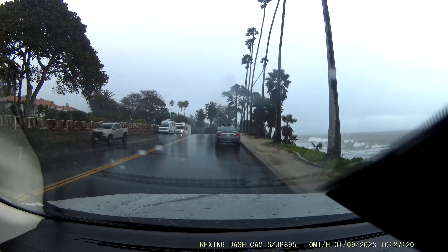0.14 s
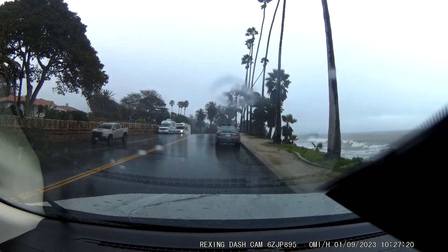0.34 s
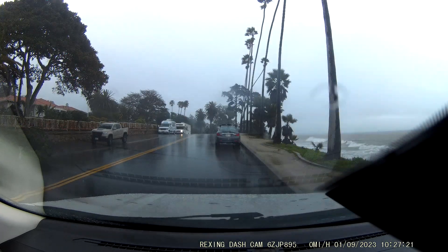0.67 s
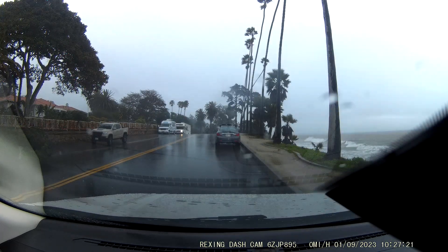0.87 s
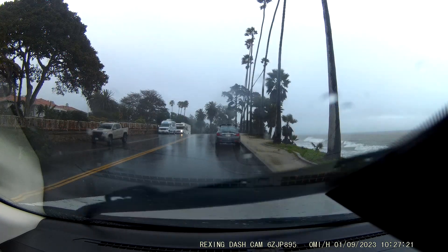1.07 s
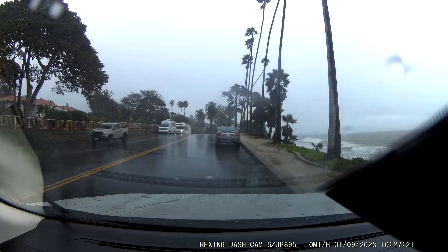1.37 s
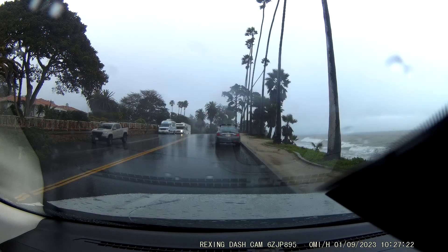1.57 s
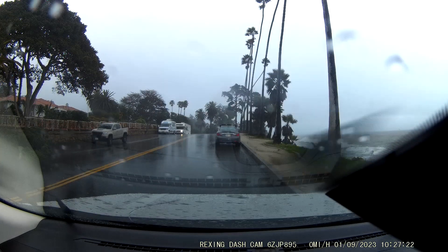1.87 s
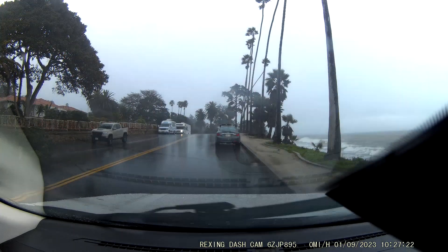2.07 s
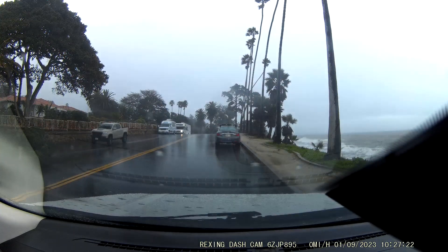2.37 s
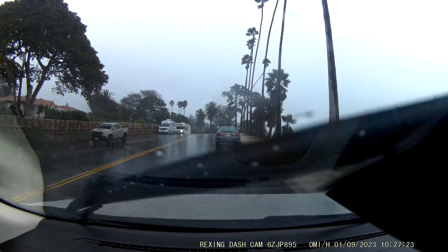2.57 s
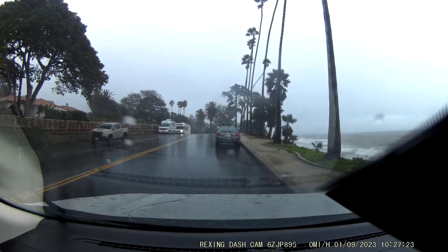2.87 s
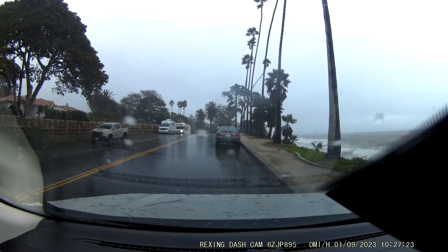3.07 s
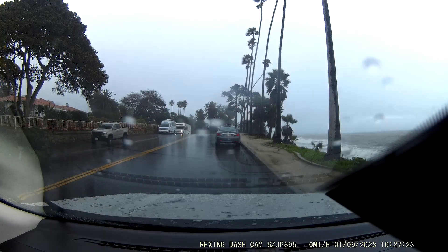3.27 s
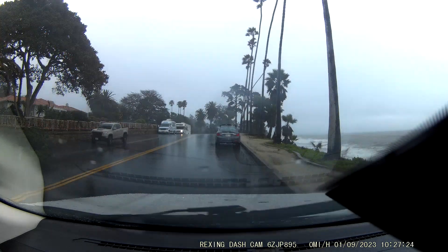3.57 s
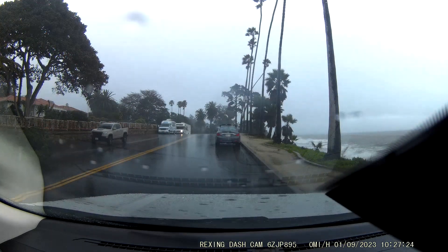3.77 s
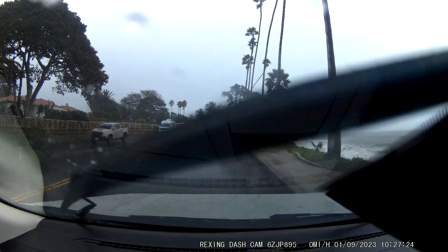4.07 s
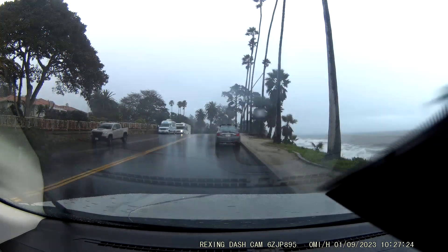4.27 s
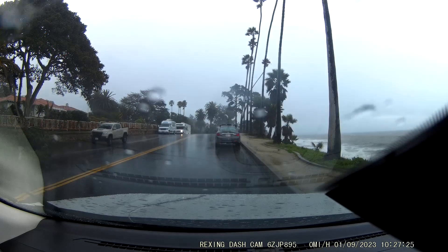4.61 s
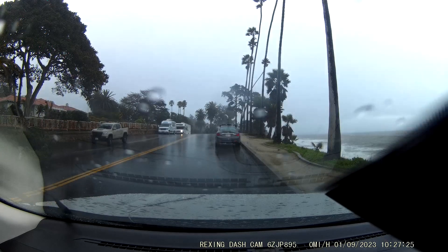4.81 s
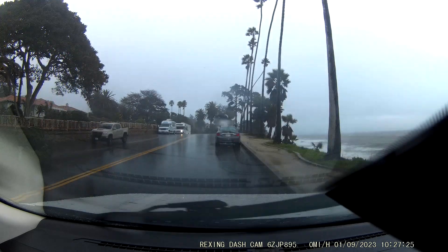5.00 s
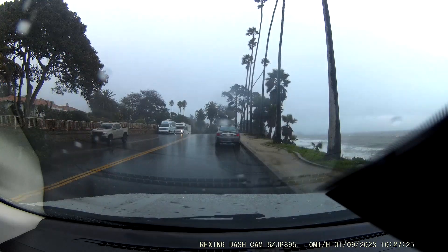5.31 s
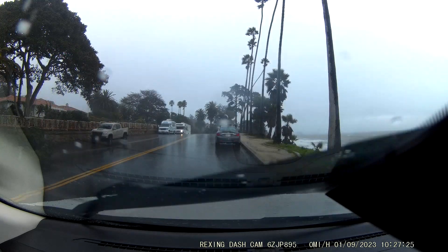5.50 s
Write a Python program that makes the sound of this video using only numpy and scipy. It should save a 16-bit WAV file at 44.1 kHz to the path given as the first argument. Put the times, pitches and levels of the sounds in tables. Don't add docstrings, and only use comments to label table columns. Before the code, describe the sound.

Rain heard from a microphone just behind the windscreen of an idling car. Fine crisp taps and fat drops scatter over a steady hum and muffled fan noise. Four hollow wiper knocks alternate with four rubbery double flips and deep body shakes. Small water spills and sharper roof pats come midway; the last flip is followed by faint approaching wet tyres.

```python
import sys
import numpy as np
from scipy import signal
from scipy.fft import rfft, irfft, next_fast_len
from scipy.io import wavfile
from scipy.ndimage import uniform_filter1d, map_coordinates

SR = 44100
rng = np.random.default_rng(int(sys.argv[2]) if len(sys.argv) > 2 else 0)


def boost_factor(decibels):
    exponent = np.asarray(decibels, float) / 20
    return 10 ** exponent


def pcm_store(signal):
    levels = np.round(np.clip(np.atleast_2d(signal), -1, 1) * 32767)
    wavfile.write(sys.argv[1], SR, levels.astype(np.int16).T)


N = 249165

# start in seconds, level in dB, brightness in dB per octave,
# level of the first touch in dB.
PARK_KNOCKS = [
    (0.1826, -18.5, 2.5, -18),
    (1.66, -19, 1, -16),
    (3.1285, -21, 1.5, -14),
    (4.601, -20, 1, -25),
]
# frequency in Hz, level in dB per Hz.
SCUFF_SPECTRUM = [(80, 4), (150, 12), (220, -6.5), (400, 1), (800, -10), (1300, -8), (2500, -28),
                  (6000, -29)]
PANE_HZ = 3305


def unit(x):
    return x / np.sqrt(np.mean(x ** 2) + 1e-20)


def curves(rows):
    s, *cols = np.transpose(rows)
    return [np.interp(np.arange(N) / SR, s, c) for c in cols]


def wobble(rate):
    knots = rng.standard_normal(int(N * rate / SR) + 4)
    return map_coordinates(knots, [np.arange(N) * rate / SR])


def swells(times, wide):
    away = np.arange(N) / SR - np.array(times)[:, None]
    return np.exp(-.5 * (away / wide) ** 2).sum(axis=0)


def coloured(x, spectrum):
    size = next_fast_len(N + 8192)
    hz, db = np.transpose(spectrum)
    bins = np.fft.rfftfreq(size, 1 / SR)
    gain = boost_factor(np.interp(np.log(bins + 1), np.log(hz + 1), db, left=-120, right=-120))
    return unit(irfft(rfft(x, size) * gain, size)[:N])


def rush(spectrum, patchy_db):
    z = signal.stft(rng.standard_normal(N), nperseg=512)[2]
    field = uniform_filter1d(rng.standard_normal(z.shape), size=6, axis=0)
    field = uniform_filter1d(field, size=10, axis=1)
    noise = signal.istft(z * boost_factor(patchy_db * unit(field)), nperseg=512)[1][:N]
    return coloured(noise, spectrum)


def add(track, s, sound):
    part = track[max(round(s * SR), 0):][:len(sound)]
    part += sound[:len(part)]


def ring(hz, t60, attack, length, crest=0):
    t = np.arange(round(length * SR)) / SR
    decay = boost_factor(-60 * t / t60)
    return np.cos(2 * np.pi * hz * (t - crest)) * decay * (1 - np.exp(-t / attack)) ** 2


def snap(low_hz, high_hz, crowd):
    band = signal.butter(N=3, Wn=[low_hz, high_hz], btype="band", fs=SR, output="sos")
    push = crowd * rng.standard_normal(900) * boost_factor(-60 * np.arange(900) / SR / 0.0042)
    push[0] = 1
    click = signal.sosfilt(band, push)
    return click / np.abs(click).max()


def gusts():
    # time in seconds, strength of the rain in dB.
    rain = [
        (0.0, -56),
        (0.28, -58.5),
        (1.41, -52),
        (2.0, -56),
        (2.53, -54.5),
        (3.38, -54.5),
        (3.79, -56),
        (4.74, -53),
        (5.24, -57),
        (5.65, -52),
    ]
    db, = curves(rain)
    return db - db.mean()


def engine():
    # time in seconds, firing rate in Hz, level in dB.
    idle = [
        (0, 29.84, -40),
        (1.5, 30.44, -40),
        (3, 30.62, -39.5),
        (4.5, 30.6, -41),
        (5.65, 29.9, -41.5),
    ]
    hz, db = curves(idle)
    turn = 2 * np.pi * np.cumsum(hz) / SR
    flutter = 1 + 0.053 * np.sin(turn / 2) + 0.049 * wobble(4.07)
    firing = boost_factor(db) * np.sqrt(2) * flutter * np.sin(turn)
    return firing + boost_factor(db - 14) * np.sin(2 * turn)


def cabin():
    # frequency in Hz, level in dB per Hz.
    blower_spectrum = [(300, -31), (450, -11), (600, -5), (720, -3), (770, -2), (802, 4), (835, -1),
                       (900, -5), (1300, -11.5), (1800, -17.5), (2500, -61)]
    # frequency in Hz, level in dB per Hz.
    hiss_spectrum = [(3240, -32), (5500, -2), (7320, -35), (8090, -7), (8970, -9), (14300, -11),
                     (15000, -11.5), (15500, -22)]
    # frequency in Hz, rms level in dB.
    whine_tones = [(7212, -102), (14423, -88)]
    blower_db, blower_follows = -48, 0.18
    hiss_db, hiss_follows = -67.5, 0.32
    blower_gain = boost_factor(blower_db + blower_follows * gusts() + 1.04 * wobble(11))
    blower = blower_gain * rush(blower_spectrum, patchy_db=-0.47)
    hiss = boost_factor(hiss_db + hiss_follows * gusts()) * rush(hiss_spectrum, patchy_db=1.5)
    t = np.arange(N) / SR
    whine = sum(boost_factor(db) * np.sqrt(2) * np.sin(2 * np.pi * hz * t) for hz, db in whine_tones)
    return blower + hiss + whine


def swish():
    # frequency in Hz, level in dB per Hz.
    spray_spectrum = [(3500, -20), (6500, -7), (9500, 0), (11500, -5), (14500, -21)]
    nearing = swells([5.68], 0.069)
    return boost_factor(-64) * nearing * rush(spray_spectrum, patchy_db=3)


def patter():
    # frequency in Hz, level in dB per Hz.
    wash_spectrum = [(880, -28), (1500, -1.5), (1640, -3.5), (2140, -5.5), (3240, -4.5), (3600, -10.5),
                     (4970, -10.5), (5440, -7.5), (7200, -17.5), (8000, -18.5), (10400, -56), (17600, -120)]
    # frequency in Hz, level in dB per Hz.
    tap_spectrum = [(1200, -30), (2000, -14), (2700, -8), (3200, 0), (3700, -3), (4800, -4), (5800, -10),
                    (7000, -22), (13000, -30), (15600, -36)]
    # frequency in Hz, level in dB per Hz.
    spill_spectrum = [(1500, -24), (2500, -4), (3250, 3.5), (3800, -6), (5500, -9), (7500, -25),
                      (13000, -37)]
    # start in seconds, level in dB, decay t60 in seconds.
    spills = [
        (3.9, -58, 0.034),
        (3.055, -41, 0.084),
        (2.9, -52, .04),
        (2, -47, 0.046),
    ]
    patter_db = -57 + gusts()
    draw = rng.random((3, N))
    struck = draw[0] < 450 / SR
    taps = struck * boost_factor(-3.2 * np.log(draw[1] + .09)) * np.sign(draw[2] - .5)
    spill = np.zeros(N)
    for s, db, t60 in spills:
        add(spill, s, boost_factor(db) * ring(0, t60, 0.0007, .08))
    wash = rush(wash_spectrum, patchy_db=.8) + .5 * coloured(taps, tap_spectrum)
    return boost_factor(patter_db + 0.58 * wobble(8.1)) * wash + spill * rush(spill_spectrum, patchy_db=0.5)


def near_drops():
    # start in seconds, peak level in dB, frequency in Hz.
    ticks = [(0.1715, -39, 3180), (0.2988, -42.5, 3860), (0.3142, -41, 3380), (0.659, -44.5, 3680),
             (1.051, -39, 3230), (1.278, -37, 3400), (1.5244, -38, 2730), (1.604, -38, 3000),
             (1.6464, -40, 3530), (1.9105, -37.5, 3150), (2.0946, -41, 3320), (2.2618, -40, 3120),
             (2.3236, -38, 3370), (2.4542, -38, 3200), (2.799, -39, 3240), (3.1742, -38.5, 3300),
             (3.21, -38, 2800), (3.2876, -39.5, 3340), (3.5269, -38.5, 3380), (3.7833, -40, 3180),
             (4.0923, -42, 3230), (4.2465, -42, 3020), (4.6606, -39.5, 3500), (4.6897, -38.5, 3310),
             (4.7364, -39, 3800), (5.1255, -39, 3350), (5.2365, -39, 3100), (5.253, -41, 3310),
             (5.3961, -46, 3250), (5.4101, -41, 3470)]
    # start in seconds, peak level in dB, body level in dB.
    plops = [(0.4439, -44, 3), (0.621, -43, 3), (1.0727, -40.5, 2), (1.1866, -30, -1.5), (1.3917, -47, 1),
             (1.455, -41, -1.5), (1.5599, -40, 4), (1.6633, -36.5, 1), (2.3405, -39, -6), (2.3504, -38, -3),
             (2.5492, -41, 6), (2.5716, -41, 2), (2.823, -39, -1.5), (3.039, -43, 2), (3.3103, -40, 6),
             (3.417, -40, -1.5), (3.5583, -35, -2), (3.934, -43, -1.5), (3.968, -38.5, 1),
             (3.9918, -40.5, 7), (4.0246, -38.5, -1.5), (4.2802, -47, 2), (4.6057, -39, 2),
             (4.9695, -40, 1), (5.0015, -41, -1.5), (5.0527, -41, 2), (5.1138, -39, 3), (5.2614, -36.5, 1),
             (5.434, -44, -5), (5.4924, -43, 3)]
    tick_body_db = -5
    stray_db, stray_spread_db, stray_body_db = -46, 3, -2
    count = int(28 * N / SR)
    when = rng.random(count) * N / SR
    size = rng.standard_normal((count, 3))
    rows = [(s, db, hz, tick_body_db) for s, db, hz in ticks]
    rows += [(s, db, PANE_HZ, body_db) for s, db, body_db in plops]
    for s, (a, b, c) in zip(when, size):
        db = stray_db + stray_spread_db * min(a, 1.4)
        rows.append((s, db, PANE_HZ * (1 + 0.063 * b), stray_body_db + 4 * c))
    return rows


def drops():
    # start in seconds, peak level in dB.
    pings = [(0.5477, -53), (0.6295, -54), (1.2775, -52), (1.3648, -50), (1.3927, -56), (2.613, -54),
             (2.7337, -52), (2.826, -51), (3.2869, -56), (3.3099, -53), (3.8467, -53), (3.9674, -52),
             (4.1225, -56)]
    # start in seconds, level in dB, frequency in Hz, t60 in seconds.
    splats = [
        (0.084, -41, 305, 0.031),
        (.63, -44, 361, 0.15),
        (3.04, -34, 890, 0.033),
        (3.056, -28.5, 1064, 0.037),
        (4.327, -27, 1300, 0.042),
        (5.059, -35, 350, 0.1),
    ]
    panel_modes = ((.9, 0), (1.02, 2), (1.2, -3))
    spray_db, spray_grows = -29.5, .5
    out = np.zeros(N)
    spray = snap(5500, 10300, crowd=0.25)
    for s, db, hz, low_db in near_drops():
        glass = .4 * ring(hz, .016, .0002, 900 / SR) + snap(.92 * hz, 4600, crowd=.12)
        low = boost_factor(low_db - 2.5) * snap(1040, 1990, crowd=0.22)
        high = boost_factor(spray_db + 16 + (spray_grows - 1) * (db + 45)) * spray
        add(out, s + .001, boost_factor(db + .3) * (glass + low + high))
    for s, db in pings:
        add(out, s, boost_factor(db + 4) * snap(4500, 11500, crowd=.25))
    for s, db, hz, t60 in splats:
        boom = sum(boost_factor(side_db) * ring(hz * k, t60, 0.0026, .1) for k, side_db in panel_modes)
        add(out, s, boost_factor(db) * boom)
    return out


def wipers():
    # frequency in Hz, level in dB per Hz.
    shake_spectrum = [(8.8, -42), (15, -13), (38, -14), (46, -41), (54, 44), (118, -1), (140, -34),
                      (180, -24), (310, -120)]
    # frequency in Hz, level in dB per Hz.
    linkage_spectrum = [(53, -13), (90, 1.5), (145, -1.5), (237, -4.5), (264, -7.5), (377, -3),
                        (426, -12.5), (650, -14), (840, -69), (1430, -120)]
    # start in seconds, level in dB.
    flips = [
        (0.879, -27),
        (.895, -28.5),
        (2.345, -27.5),
        (2.36, -27.5),
        (3.821, -25.5),
        (3.84, -29),
        (5.292, -27.5),
        (5.305, -27.5),
    ]
    # frequency in Hz, level in dB, decay t60 in seconds.
    blade_modes = [(157, -3, 0.082), (194, -2.5, 0.13), (354, 7, 0.014), (430, -1, 0.022), (570, -7, .04),
                   (700, -12, 0.096)]
    # start in seconds, level in dB, start frequency in Hz,
    # end frequency in Hz, rise in seconds.
    shudders = [(0.888, -25, 143, 54.7, 0.026), (0.941, -37, 60, 45, 0.015), (1.078, -31, 101, 66, 0.018),
                (1.128, -31.5, 92, 56, 0.019), (2.347, -27, 150, 51.6, 0.041),
                (2.534, -33.5, 101, 61, 0.021), (2.6, -35, 70, 48, 0.018), (3.829, -25.5, 150, 49.5, 0.032),
                (3.998, -32, 106, 64.5, 0.026), (5.297, -25.5, 150, 48.7, 0.041),
                (5.48, -28, 101, 67.7, 0.027)]
    parks = np.array([row[0] for row in PARK_KNOCKS])
    turns = np.array([row[0] for row in flips[::2]])

    shake_db = -52.5 + 10.5 * swells(turns + 0.2, .1) - 5 * swells(parks - 0.16, 0.16)
    linkage_db = -48.5 + 8 * swells(parks - 0.11, 0.075) + 2.5 * swells(turns + .16, 0.09)
    out = boost_factor(shake_db + 1.5 * wobble(14)) * rush(shake_spectrum, patchy_db=2.5)
    out += boost_factor(linkage_db + 0.73 * wobble(11)) * rush(linkage_spectrum, patchy_db=1.5)

    drag = np.zeros(N)
    for s, db in flips:
        add(drag, s, boost_factor(db - 5.5) * ring(0, 0.096, 0.0039, .15))
        spread = rng.standard_normal((len(blade_modes), 3))
        for (hz, level, t60), (a, b, c) in zip(blade_modes, spread):
            crest = 0.00294 + 0.00211 * c
            mode = ring(hz * (1 + 0.057 * b), t60, 0.0011, .15, crest=crest)
            add(out, s, boost_factor(db + level - 4.5 + 2.4 * a) * mode)
    out += drag * rush(SCUFF_SPECTRUM, patchy_db=0.5)

    t = np.arange(SR // 4) / SR
    for s, db, hz, end_hz, rise in shudders:
        falling = end_hz + (hz - end_hz) * np.exp(-t / (0.55 * rise))
        swell = (t / rise * np.exp(1 - t / rise)) ** 4
        add(out, s, boost_factor(db) * swell * np.sin(2 * np.pi * np.cumsum(falling) / SR))
    return out


def knocks():
    # frequency in Hz, level in dB, decay t60 in seconds.
    cowl_modes = [(104.5, -6, 0.23), (150, -5, 0.25), (176, 7.5, 0.087), (220, -0.5, .08),
                  (321, 1.5, 0.092), (350, -13, 0.12), (572, 6.5, 0.028), (700, -14, 0.049),
                  (800, -9.5, 0.037), (1070, -29, 0.014), (1304, -25.5, 0.068), (2050, -28, 0.0068),
                  (2620, -30, 0.034), (5470, -28, 0.019)]
    # frequency in Hz, level in dB per Hz.
    rattle_spectrum = [(70, -40), (150, -24), (250, -5), (340, 6), (600, -18), (1200, -13)]
    rise_s, crest_s = .0032, .0026
    out, shaken, slap = np.zeros((3, N))
    for s, db, bright_db, touch_db in PARK_KNOCKS:
        blow = 0
        for hz, level, t60 in cowl_modes:
            mode_db = level + bright_db * np.log2(hz / 200)
            blow = blow - boost_factor(mode_db) * ring(hz, t60, rise_s, .3, crest=crest_s)
        add(out, s, boost_factor(db) * blow)
        add(out, s - .014, boost_factor(db + touch_db) * blow)
        add(out, s + 0.00198, boost_factor(db - 17.5) * snap(490, 1930, crowd=0.41))
        add(shaken, s, boost_factor(db - 12.5) * ring(0, 0.31, 0.0031, .3))
        add(slap, s, boost_factor(db - 9.5) * ring(0, 0.076, .002, .1))
    rattle = shaken * rush(rattle_spectrum, patchy_db=-1.5)
    return out + rattle + slap * rush(SCUFF_SPECTRUM, patchy_db=-1.5)


def scene():
    background = engine() + cabin() + swish() + patter()
    return (background + drops() + wipers() + knocks())[None]


def band_limit(x):
    return signal.sosfilt(signal.butter(12, 15640, fs=SR, output="sos"), x)


def record(dry):
    return band_limit(dry)


dry = scene()
out = record(dry)
pcm_store(out)
```